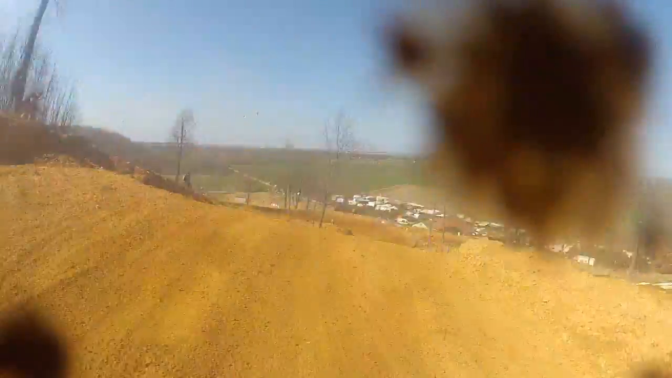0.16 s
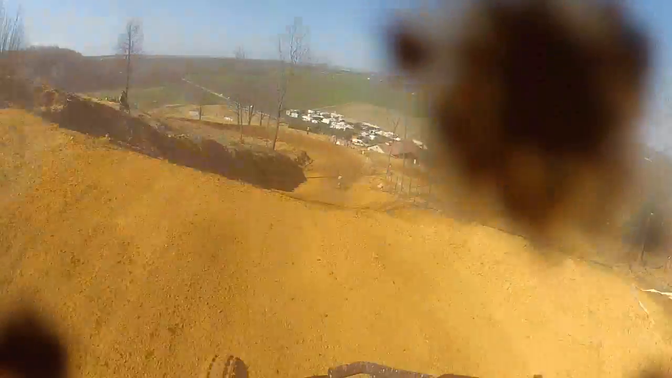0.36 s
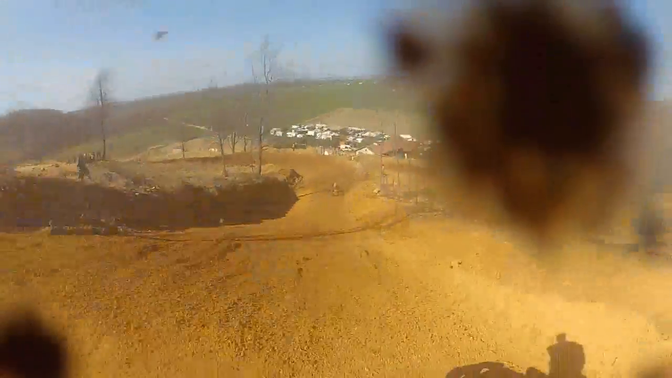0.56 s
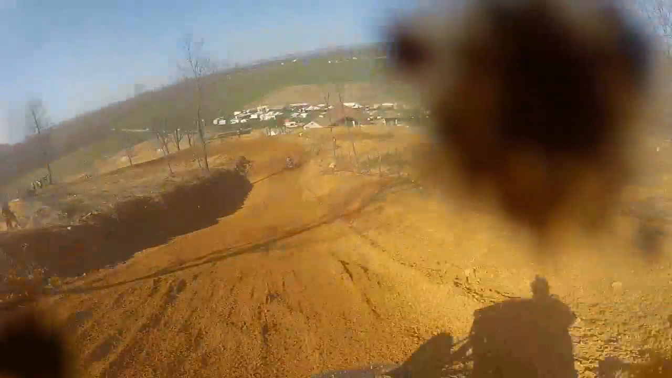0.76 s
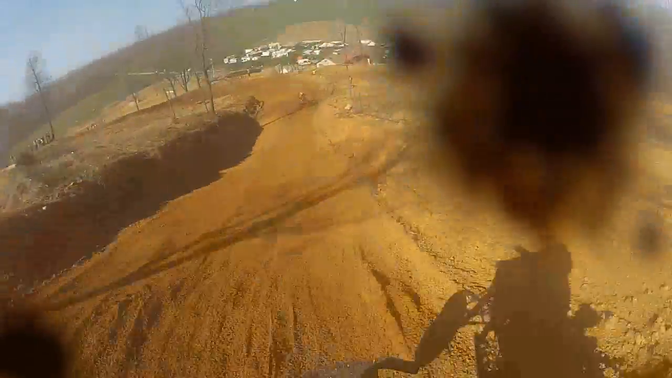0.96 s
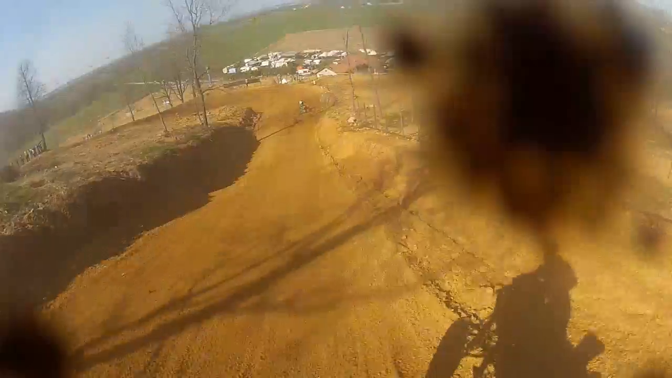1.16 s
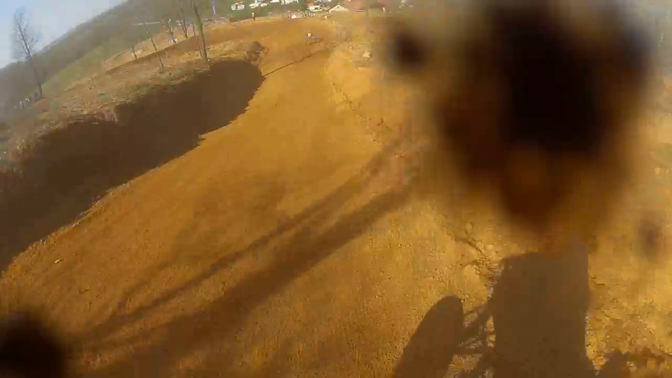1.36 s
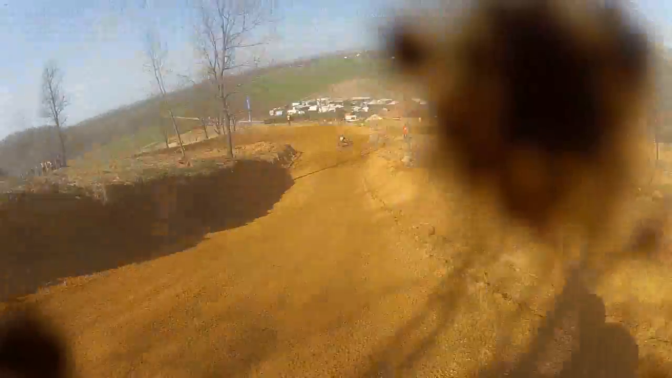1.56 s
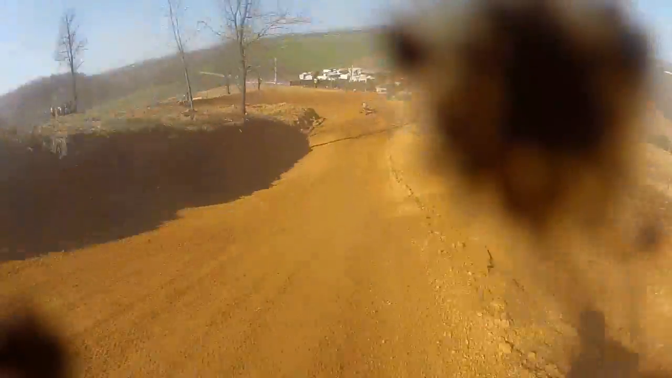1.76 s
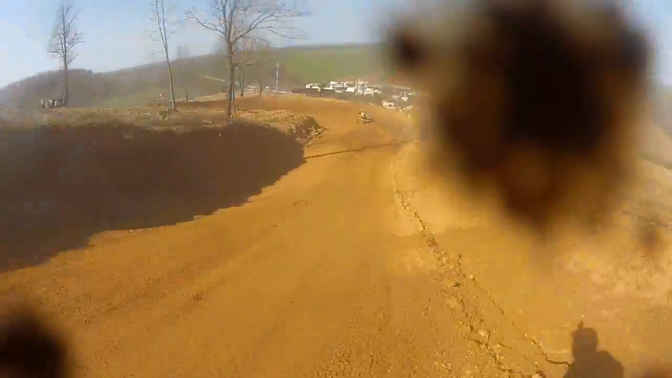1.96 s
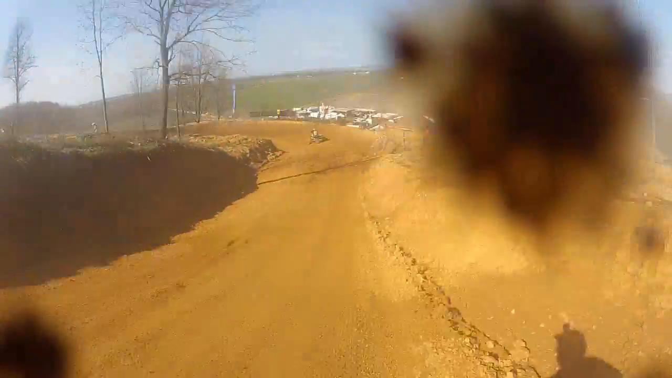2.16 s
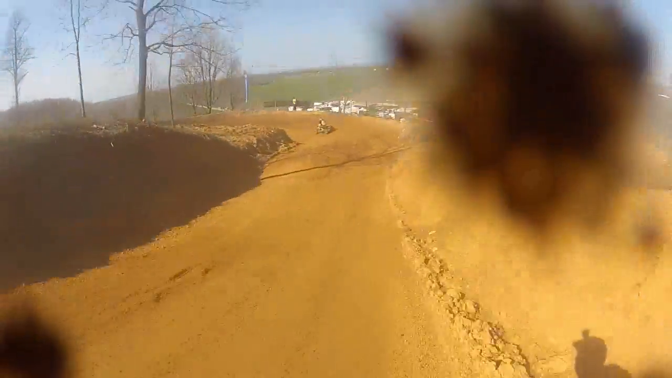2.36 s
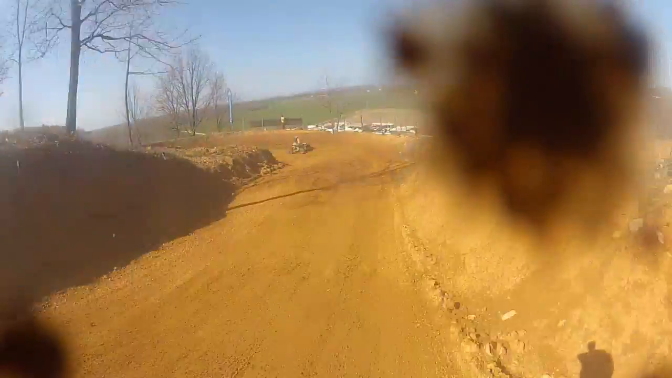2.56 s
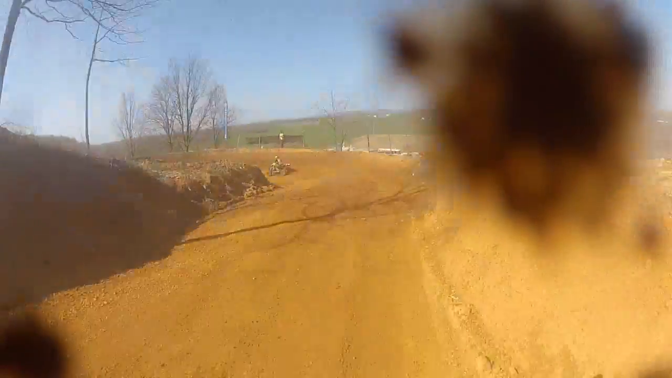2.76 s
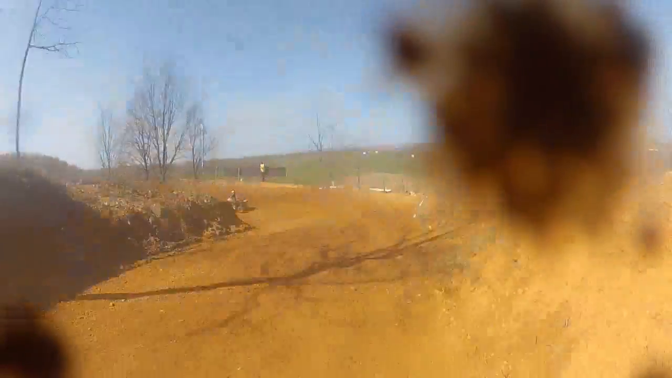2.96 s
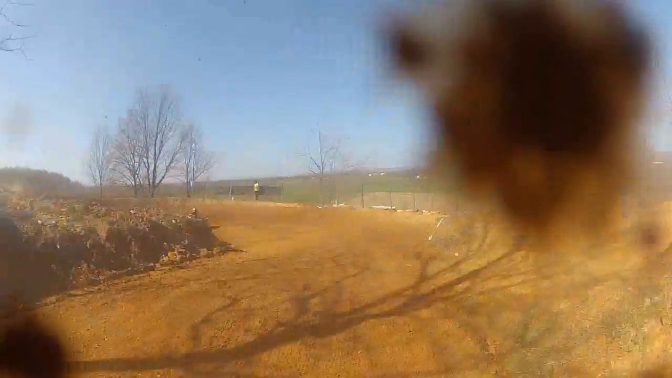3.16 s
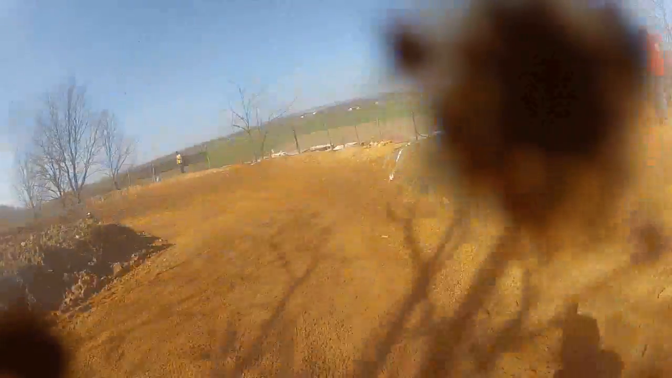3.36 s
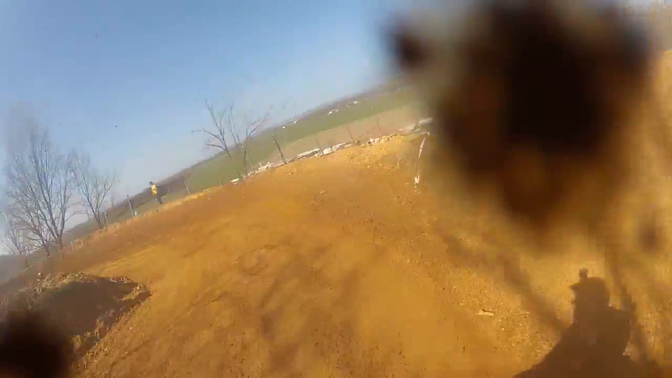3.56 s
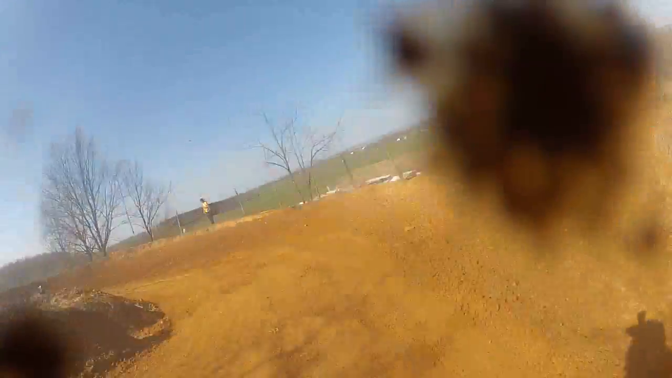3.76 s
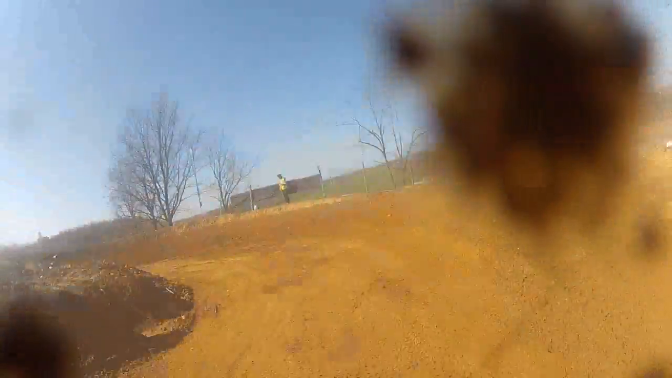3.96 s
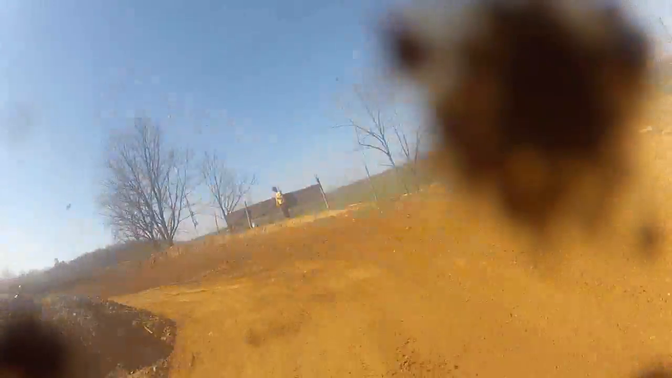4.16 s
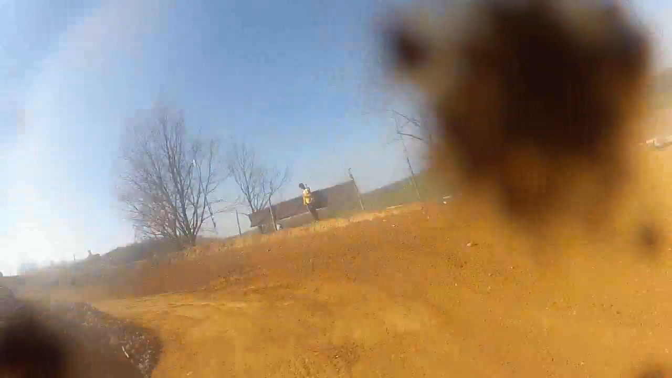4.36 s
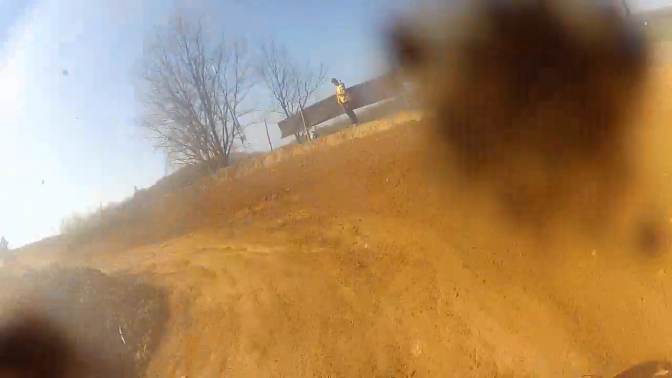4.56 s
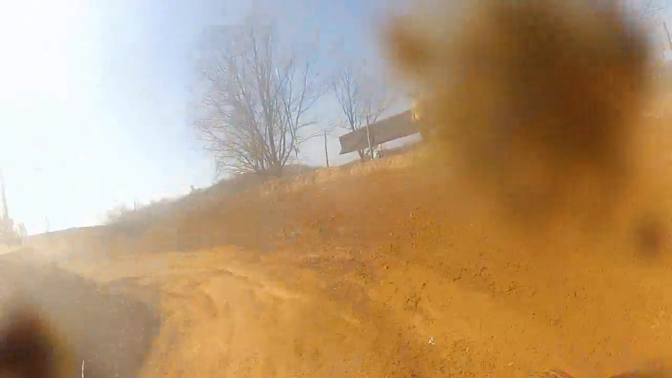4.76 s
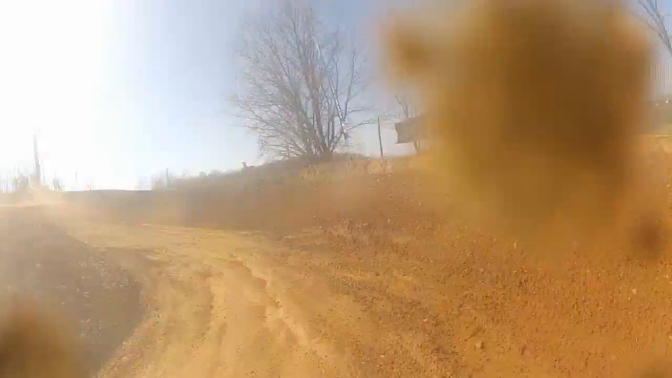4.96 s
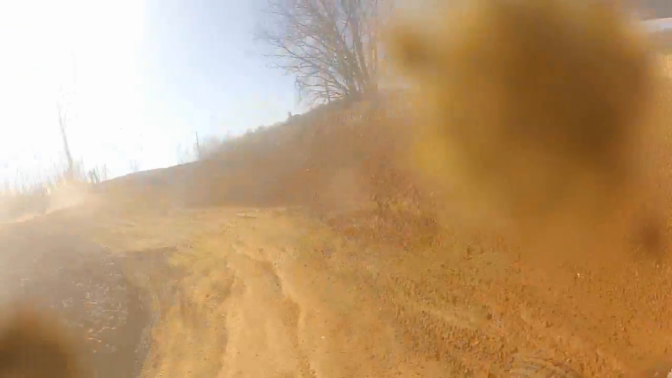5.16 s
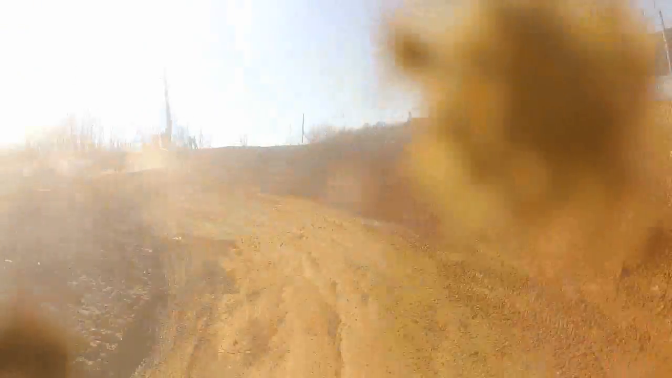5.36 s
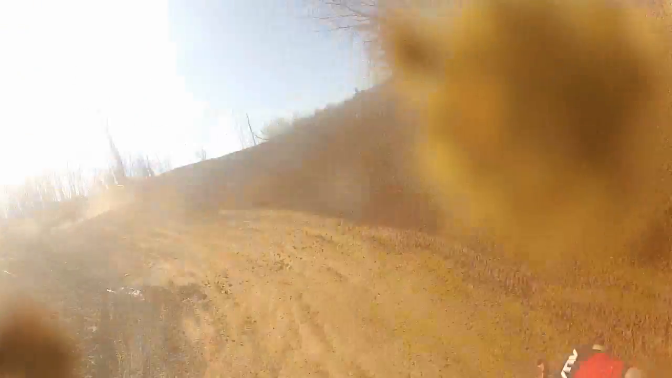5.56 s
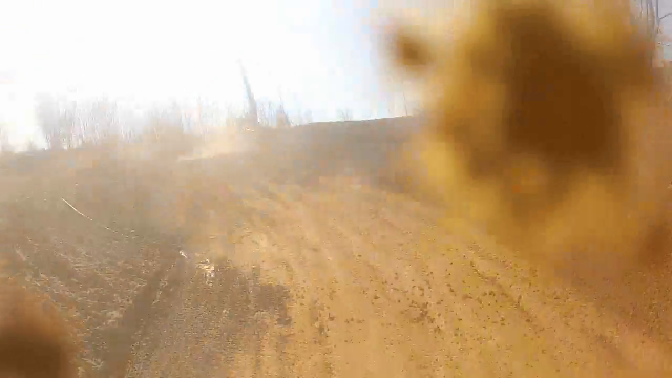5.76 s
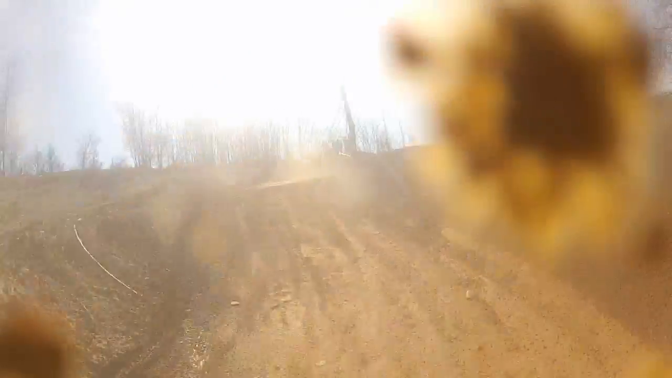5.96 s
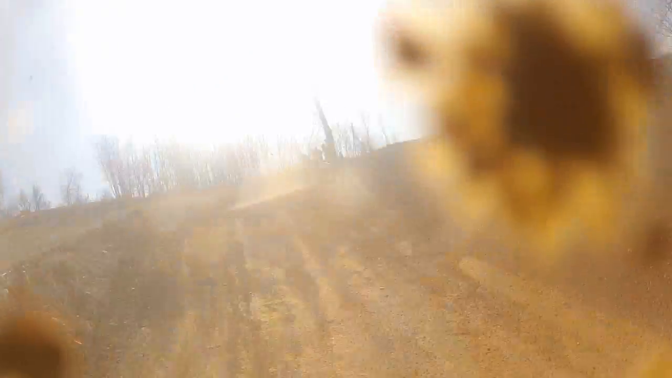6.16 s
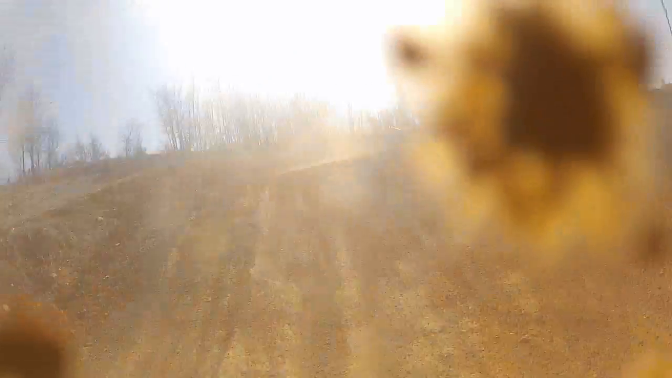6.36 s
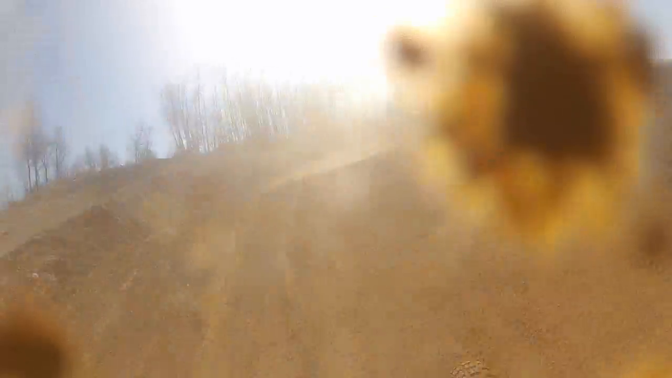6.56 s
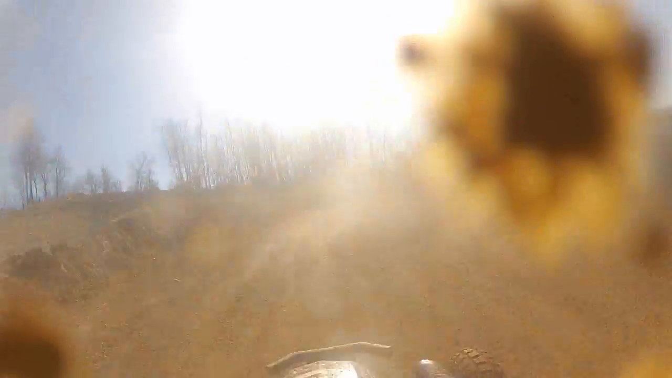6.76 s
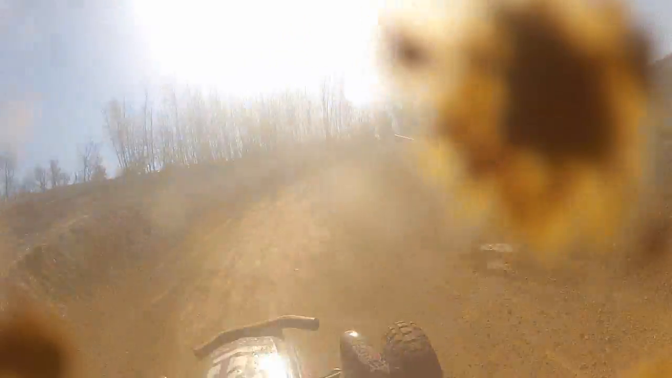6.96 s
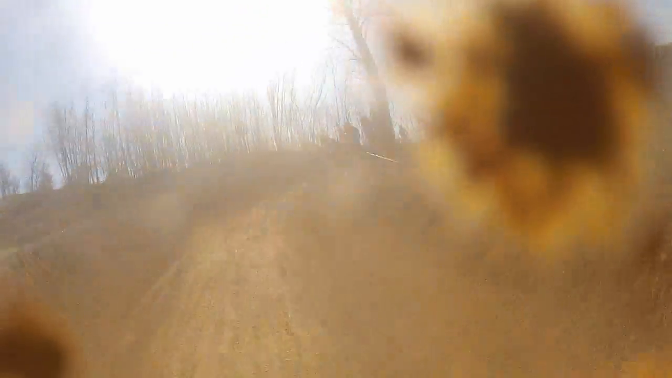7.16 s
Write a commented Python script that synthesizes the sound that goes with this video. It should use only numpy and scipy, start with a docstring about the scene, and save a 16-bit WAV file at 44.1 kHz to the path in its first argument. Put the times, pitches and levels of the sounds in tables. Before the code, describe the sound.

A single-cylinder quad bike races on a dirt track, heard close from a microphone on the rider. The engine climbs to a hard, snarling rev, sinks to a low, clattering putter for a few seconds, then pulls up again in several bursts. Wind rumbles on the microphone throughout, dull thumps come from bumps in the ground, and the tyres add brief gritty skids as the engine slows and picks up.

```python
"""On a dirt track, a single-cylinder quad bike races, heard from a small camera housed on the rider.
Wind turbulence rumbles on the closed housing, and jolts from the ground excite its lowest mode.
The engine's periodic firing gives a harmonic series that rings in the exhaust pipe, while gas hiss
and clatter throb with each firing and swell in the skids. The loudest thumps overload the
microphone and duck its gain."""
import sys
import numpy as np
from scipy import signal
from scipy.fft import rfft, irfft
from scipy.io import wavfile
from scipy.ndimage import uniform_filter1d

SR = 44100
rng = np.random.default_rng(int(sys.argv[2]) if len(sys.argv) > 2 else 0)


def inscribe(sig):
    """Save sig as 16-bit PCM at rate SR to the path in sys.argv[1].

    A 1-D sig is mono; a 2-D sig holds one channel per row.
    Samples are clipped to [-1, 1] before scaling.
    """
    pcm = np.round(np.clip(np.atleast_2d(sig).T, -1, 1) * 32767)
    wavfile.write(sys.argv[1], SR, pcm.astype(np.int16))


N = 321930


def amp(db):
    """The decibel scale: 20 dB is a factor of ten in amplitude."""
    return 10 ** (np.asarray(db) / 20)


def rms_one(x):
    """Normalisation to unit mean power."""
    return x / np.sqrt(np.mean(x ** 2) + 1e-20)


def in_time(rows):
    """Linear interpolation of (seconds, value) rows at every sample."""
    return np.interp(np.arange(N) / SR, *np.transpose(rows))


def colour(x, points):
    """Spectral shaping by (Hz, dB) points, joined on a logarithmic frequency axis."""
    hz = np.maximum(np.fft.rfftfreq(N, 1 / SR), 1)
    point_hz, point_db = np.transpose(points)
    return irfft(rfft(x) * amp(np.interp(np.log(hz), np.log(point_hz), point_db)), N)


def drift(hz):
    """Random fluctuation: low-passed noise of rms 1."""
    r = np.exp(-2 * np.pi * hz / SR)
    return rms_one(signal.lfilter([1], [1, -2 * r, r * r], rng.standard_normal(N + SR))[SR:])


def resonate(x, modes):
    """Modal superposition: damped resonators in parallel, with alternating signs."""
    out = 0
    for k, (hz, width_hz, level_db) in enumerate(modes):
        r = np.exp(-np.pi * width_hz / SR)
        feed = (1 - r * r) / 2 * np.array([1, 0, -1])
        feedback = [1, -2 * r * np.cos(2 * np.pi * hz / SR), r * r]
        out = out + (-1) ** k * amp(level_db) * signal.lfilter(feed, feedback, x)
    return out


def evened(x, seconds=0.169):
    """Division by the running rms, so that an envelope alone sets the slow level."""
    return x / np.sqrt(uniform_filter1d(x ** 2, int(seconds * SR)) + 1e-12)


def held(start, rise, end, fall_s=0.041):
    """A trapezoidal envelope from 0 to 1: it rises, holds and falls."""
    t = np.arange(N) / SR
    return np.clip(np.minimum((t - start) / rise, 1 + (end - t) / fall_s), 0, 1)


def wind():
    """Turbulence: air tearing past the housing makes lumpy, low pressure noise."""
    # Strength of the rumble. Each row: time in seconds, level in dB.
    gusts = [(0.0, -24.5), (0.45, -21.5), (1.02, -30.5), (1.2, -20.5), (1.34, -24), (1.46, -41), (1.8, -27),
             (2.45, -33), (2.65, -20), (3.09, -20), (3.5, -26.5), (4.23, -27.5), (4.76, -31), (5.08, -21.5),
             (5.3, -27.5), (5.51, -22), (5.88, -30), (6.04, -25), (6.25, -35), (6.57, -37), (6.77, -17.5),
             (6.97, -14), (7.3, -25)]
    # Its spectrum. Each row: frequency in Hz, relative spectral density in dB.
    spectrum = [(12, -34), (20, -7), (125, -5.5), (173, -10), (206, -18.5), (311, -8), (400, -15),
                (520, -24), (880, -120)]
    return amp(in_time(gusts) + 3.3 * drift(13.6)) * rms_one(colour(rng.standard_normal(N), spectrum))


def jolts(swell_s=0.0041, t60_s=0.1):
    """Damped free vibration: each jolt rings the housing's lowest mode for a few cycles."""
    # Each row: start in seconds, level in dB before swell and decay, ring frequency in Hz.
    impacts = [(0.2133, 8.5, 104.6), (0.389, -4.5, 88), (0.5, -12, 95.2), (1.676, -2, 98.5),
               (1.727, -1.5, 74), (1.798, 9.5, 98), (2.635, -7, 115.3), (2.826, -7, 113.6),
               (2.939, -9, 100.7), (3.0923, 9, 110.6), (3.2761, 8, 102.9), (3.389, 10.5, 103.4),
               (4.24, -5, 99.3), (4.409, 2, 108), (4.99, -12, 94.8), (5.129, 7.5, 93.6), (5.2, -8, 70),
               (5.289, -1, 105), (5.42, -14, 95), (5.631, 0.5, 88.9), (5.88, -12, 95.04), (6.14, -6, 94),
               (6.829, -3, 98.35), (6.926, -3, 79.8), (6.945, -1, 95), (6.991, 9.5, 97.85)]
    out, t = np.zeros(N), np.arange(SR // 4) / SR
    for start, level_db, hz in impacts:
        at = round(start * SR)
        envelope = (1 - np.exp(-t / swell_s)) * amp(level_db - 60 * t / t60_s)
        ring = envelope * np.sin(2 * np.pi * hz * t)
        out[at:at + len(t)] += ring[:N - at]
    return out


def skid_envelope(rise_s=0.05):
    """Sliding friction: the amplitude of the noise added while the tyres tear at the dirt."""
    # Each row: start in seconds, end in seconds, level in dB.
    skids = [(2.639, 3.08, -25.5), (3.199, 3.37, -31.5), (3.83, 3.933, -34), (5.55, 5.77, -24)]
    return sum(amp(db) * held(start, rise_s, end) for start, end, db in skids)


def riding(firing_hz):
    """Engine load: an open throttle makes the sound louder and more periodic. Returns control curves."""
    # Throttle pulls. Each row: opening, rise time and shutting in seconds, first and last note level
    # in dB, clatter in dB, snarl against rasp in dB, emphasised frequency of the note in Hz.
    pulls = [(-0.05, .04, 0.31, -14.5, -19.5, -22, 1.5, 254),
             (0.3, 0.052, 0.5, -17, -18.5, -22.5, 1.5, 273),
             (0.51, 0.13, 0.82, -16.5, -13.5, -23.5, 5, 256), (0.955, .075, 1.104, -5, -11.5, -17, 0, 334),
             (1.26, 0.034, 1.565, -14, -9.5, -20, 2, 253), (1.59, 0.041, 1.846, -9, -16, -24, 2.5, 309.3),
             (1.81, 0.13, 2.46, -7, -14, -20, 2.5, 284.9),
             (4.079, .08, 4.4, -29.5, -29.5, -34, -5.5, 270.6),
             (4.46, 0.087, 4.95, -35, -32, -30, -3, 270.5), (5.14, 0.11, 5.47, -23, -24, -24, 0, 233),
             (5.49, .08, 5.78, -11, -8.5, -18.5, 1, 289.3), (5.8, 0.19, 6.41, -11, -10.5, -18.5, 4, 284.9),
             (6.48, .07, 7.015, -9, -10, -18.5, 3.5, 304.9), (7.18, 0.053, 7.3, -4, -11.5, -15.5, 1.5, 255)]
    # Dropouts of the note. Each row: centre in seconds, length in seconds, level change in dB.
    misfires = [(0.116, 0.05, -6), (1.5, 0.2, -7.5), (2.169, 0.043, -8.5), (2.255, 0.039, -7),
                (2.389, .1, -15.5), (6.03, 0.036, -2.5), (6.9, .05, -3)]
    t, octaves = np.arange(N) / SR, np.log2(firing_hz / 60)
    # With the throttle shut, note and clatter still grow with engine speed.
    note, shut_clatter = amp(-33.5 + 9 * octaves), amp(-26 + 9.5 * octaves)
    throttle, clatter, snarl_db, centre_hz, locked_shut = 0, 0, -1, 230, 0.2
    for start, rise, end, first_db, last_db, clatter_db, pull_snarl_db, hz in pulls:
        pull = held(start, rise, end)
        throttle = np.maximum(throttle, pull)
        centre_hz = centre_hz + pull * (hz - centre_hz)
        snarl_db = snarl_db + pull * (pull_snarl_db - snarl_db)
        note = note + pull * amp(np.interp(t, [start, end], [first_db, last_db]))
        clatter = clatter + pull * amp(clatter_db)
    note = note * amp(sum(db * np.exp(-((t - s) / length * 2) ** 2) for s, length, db in misfires))
    clatter, skid = np.hypot(clatter, shut_clatter), skid_envelope()
    hiss = np.hypot(clatter * amp(np.interp(throttle, [0, 1], [-6.5, -9])), skid)
    clatter = np.hypot(clatter, skid * amp(1.5))
    locked_open = np.interp(firing_hz, [55, 76, 88], [.53, .68, .88])
    locked = locked_shut + throttle * (locked_open - locked_shut)  # clatter's share tied to the firings
    return note, clatter, hiss, centre_hz, snarl_db, locked


def orders(cycles, firing_hz, centre_hz, count=30, waver_db=4.5, waver_hz=8.0, width_hz=55, lift_db=13):
    """Harmonics of the firing rate, each wavering as with ground echoes: lifted at centre_hz, and flat."""
    knots = rng.standard_normal((count, int(N / SR * waver_hz) + 2))
    phases = rng.uniform(0, 2 * np.pi, count)
    at = np.arange(N) / SR * waver_hz
    lifted = flat = 0
    for k in range(1, count):
        waver = amp(waver_db * np.interp(at, np.arange(knots.shape[1]), knots[k]))
        line = waver * np.cos(2 * np.pi * k * cycles + phases[k] * (k > 6))  # the lowest six form a pulse
        flat = flat + line
        lifted = lifted + line * amp(lift_db * np.exp(-((k * firing_hz - centre_hz) / width_hz) ** 2))
    return lifted, flat


def exhaust_note(pulses):
    """Air-column resonance: the pipe rings at its modes and passes little below the first."""
    # Each row: frequency in Hz, bandwidth in Hz, gain in dB.
    pipe_modes = [(221.4, 107.3, 2.5), (266, 83.5, 5), (338, 56.4, 0), (493.4, 20, -6)]
    band = signal.butter(3, [170, 520], "band", fs=SR, output="sos")
    return evened(signal.sosfilt(band, resonate(pulses, pipe_modes)))


def body_clatter(blows, gas, snarl_db):
    """Forced vibration: firing blows and gas noise make the silencer snarl and the engine casing rasp."""
    # Each row of both: frequency in Hz, bandwidth in Hz, gain in dB.
    silencer_modes = [(752, 89, -6), (900.5, 101, -2.5), (1171, 48, 1.5), (1248, 51, 3)]
    casing_modes = [(478, 194, -6.5), (1030, 207, -7.5), (1887, 223, -2), (2484, 308, -5.5)]
    snarl = amp(snarl_db) * resonate(blows, silencer_modes)
    return evened(snarl + resonate(0.8 * blows + 0.51 * gas, casing_modes))


def hiss_and_whine(gas, drive_noise):
    """Resonant filtering of noise: the housing colours the gas hiss, and the drive train whines."""
    # Each row of both: frequency in Hz, bandwidth in Hz, gain in dB.
    housing_modes = [(3070, 1250, -6), (5400, 207, -3), (6606, 230, -3.5), (8100, 390, -9),
                     (9680, 810, -5.5), (11700, 3900, -15.5), (14130, 1030, -9)]
    drive_modes = [(3667, 245, 0), (8450, 250, -6.5)]
    # Each row: time in seconds, gain of the whine against the hiss in dB.
    whine_db = [(0.0, -3.5), (1.5, -2.5), (1.8, -1), (2.45, -3), (2.68, 7), (4.05, 4), (4.55, 0.5),
                (6.1, 2.5), (6.6, -1), (7.3, -3)]
    hiss = resonate(gas * amp(1.2 * drift(17)), housing_modes)
    return evened(hiss + amp(in_time(whine_db)) * resonate(drive_noise, drive_modes))


def engine():
    """Source and filter: firing harmonics and gas noise that throbs with them drive the resonances."""
    # Engine speed. Each row: time in seconds, firings per second.
    speed = [(0.0, 78), (0.1, 56), (0.18, 58.3), (0.3, 48), (0.44, 56.7), (0.73, 64.4), (0.82, 68.5),
             (0.92, 58.3), (0.98, 64.6), (1.11, 83), (1.17, 85), (1.28, 82.3), (1.4, 96.4), (1.54, 102),
             (1.6, 100), (1.67, 79.5), (1.74, 86.5), (1.84, 75), (1.96, 96.5), (2.16, 98.6), (2.23, 90.4),
             (2.29, 97), (2.5, 94.4), (2.58, 88), (2.82, 75.6), (3.05, 65), (3.43, 53.7), (3.98, 50.6),
             (4.13, 51.2), (4.3, 50.6), (4.43, 45), (4.58, 55.6), (4.71, 53), (4.9, 51.5), (5.0, 53),
             (5.1, 51), (5.3, 57.8), (5.41, 53.4), (5.57, 54.8), (5.71, 79.3), (5.88, 61), (5.98, 68.3),
             (6.04, 67.2), (6.19, 75.2), (6.32, 85), (6.43, 86), (6.52, 70.3), (6.6, 73.3), (6.85, 80.2),
             (6.91, 72), (6.98, 80.6), (7.18, 65.3), (7.3, 77)]
    # Steadier firing smooths the note. Each row: locked share of the clatter, roughness from 0 to 1.
    roughness = [(.2, .72), (.53, .25), (.9, .16)]
    firing_hz = in_time(speed)
    note_gain, clatter_gain, hiss_gain, centre_hz, snarl_db, locked = riding(firing_hz)
    rough = np.interp(locked, *np.transpose(roughness))
    jitter = (.003 + .018 * rough) * drift(20)  # early and late firings blur the high orders most
    cycles = np.cumsum(firing_hz) / SR + jitter
    burn = amp(4.9 * rough * rng.standard_normal(N)[(cycles + .5).astype(int)])  # one strength per firing
    lifted, flat = orders(cycles, firing_hz, centre_hz)
    line_gain = burn * np.sqrt(firing_hz / SR) * 2  # keeps the power per Hz independent of speed
    throb = np.cos(np.pi * cycles) ** 2
    pipe_gas, body_gas, hiss_gas, drive_noise = [
        rms_one(rng.standard_normal(N) * (floor + depth * throb))
        for floor, depth in ((.3, burn), (1.6, burn), (1.8, 0.49), (2.5, 1))]
    note = exhaust_note(np.sqrt(1 - rough ** 2) * line_gain * lifted + rough * pipe_gas)
    blows = locked * line_gain * flat + np.sqrt(1 - locked ** 2) * body_gas
    # The crank turns twice per firing, so it sounds the even orders.
    crank = locked * amp(-15) * sum(np.cos(2 * np.pi * 2 * k * cycles) for k in range(1, 5))
    clatter = body_clatter(blows, body_gas, snarl_db) + crank
    return note_gain * note + clatter_gain * clatter + hiss_gain * hiss_and_whine(hiss_gas, drive_noise)


def scene():
    """Superposition at two ports: nearly mono, with an unsteady difference that grows in the treble."""
    # Left-right difference. Each row: frequency in Hz, gain in dB.
    side_spectrum = [(60, -32), (300, -31), (600, -19.5), (2000, -21.5), (4000, -12.5), (8000, -12.5),
                     (12000, -8.5)]
    mid = engine() + wind() + jolts()
    side = colour(mid * drift(105), side_spectrum)
    return np.array([amp(0.1) * (mid + side), amp(0.5) * (mid - side)])


def gain_control(x, threshold_db=-0.13, share=0.98, attack_s=0.0071, release_db_per_s=42):
    """Automatic gain control: loud peaks turn the gain down a moment late; it recovers steadily."""
    over_db = np.maximum(20 * np.log10(np.abs(x).max(axis=0) + 1e-9) - threshold_db, 0)
    release_db = release_db_per_s * np.arange(N) / SR
    duck_db = np.maximum.accumulate(over_db + release_db) - release_db
    r = np.exp(-1 / (attack_s * SR))
    return x * amp(-share * signal.lfilter([1 - r], [1, -r], duck_db))


def record(dry):
    """Cancellation and saturation: the housing notches a band, the gain ducks, peaks clip, the top is cut."""
    notch_hz, notch_width_hz, cutoff_hz = 6056, 2500, 14450
    ceiling, knee = .98, 14.0
    notched = signal.lfilter(*signal.iirnotch(notch_hz, notch_hz / notch_width_hz, fs=SR), dry)
    ducked = gain_control(notched)
    clipped = ducked / (1 + np.abs(ducked / ceiling) ** knee) ** (1 / knee)
    return signal.sosfilt(signal.ellip(14, .5, 80, cutoff_hz, fs=SR, output="sos"), clipped)


dry = scene()
out = record(dry)
inscribe(out)
```